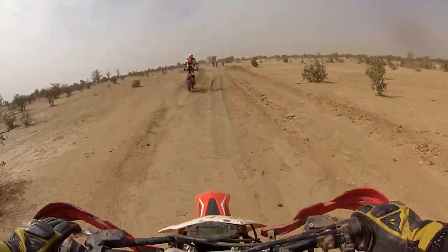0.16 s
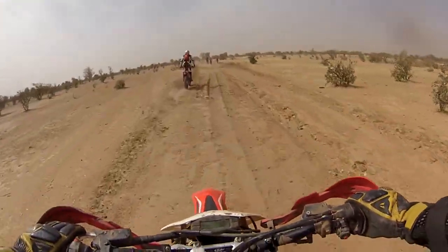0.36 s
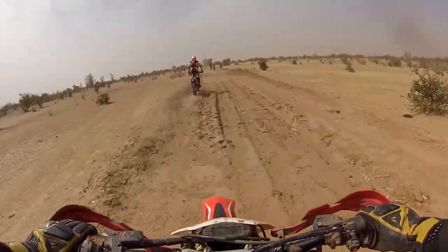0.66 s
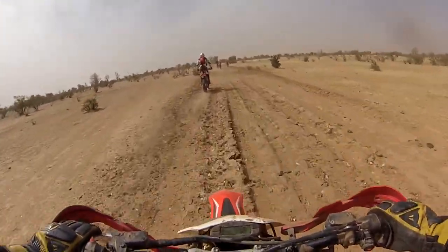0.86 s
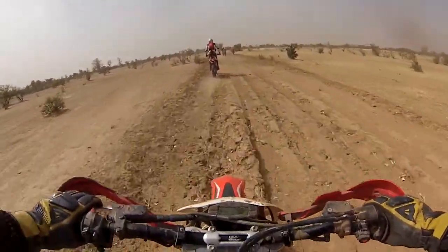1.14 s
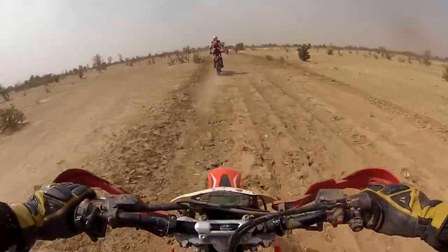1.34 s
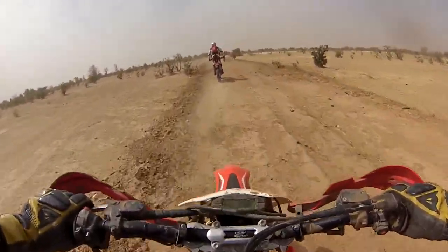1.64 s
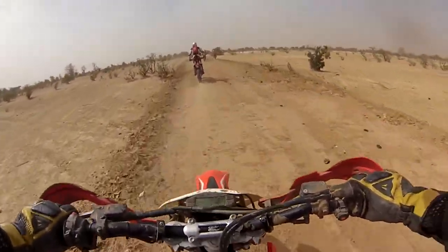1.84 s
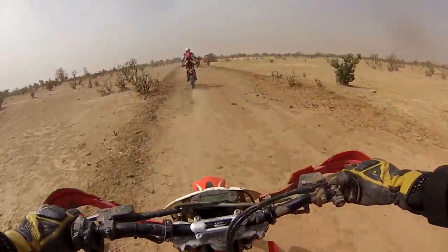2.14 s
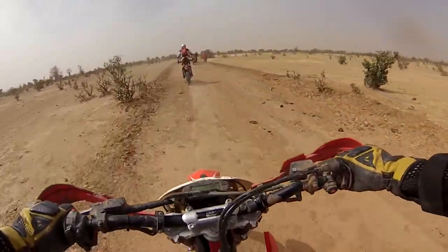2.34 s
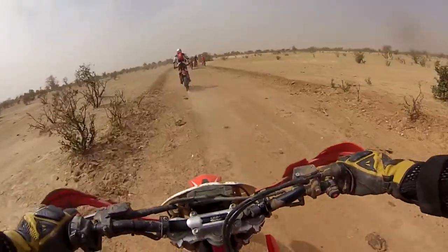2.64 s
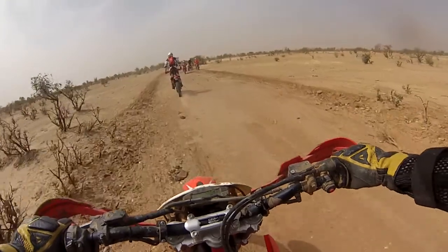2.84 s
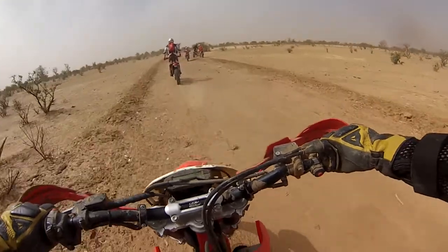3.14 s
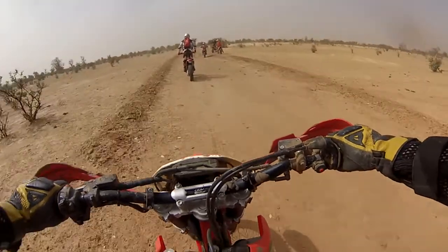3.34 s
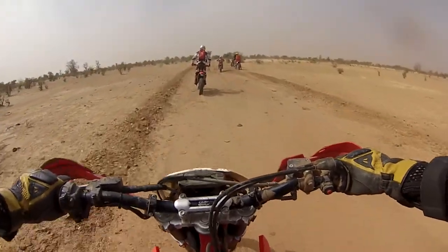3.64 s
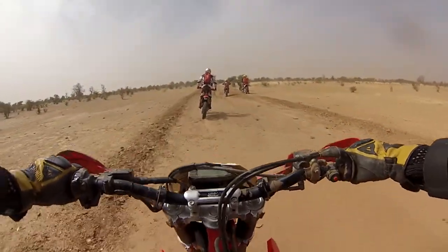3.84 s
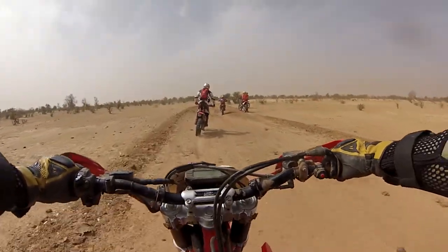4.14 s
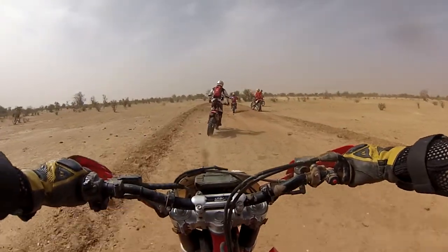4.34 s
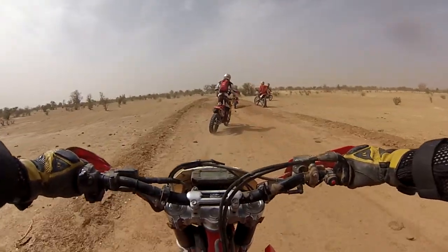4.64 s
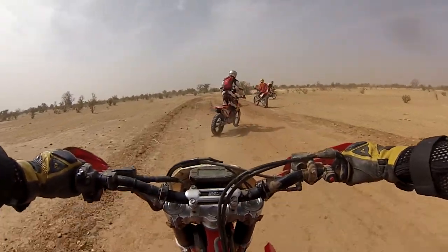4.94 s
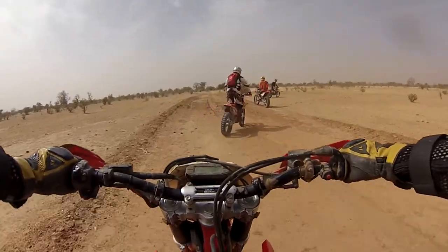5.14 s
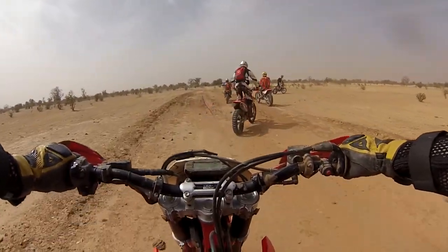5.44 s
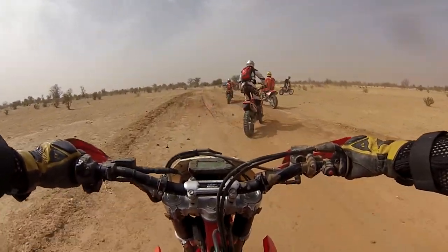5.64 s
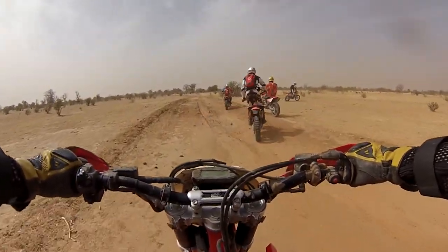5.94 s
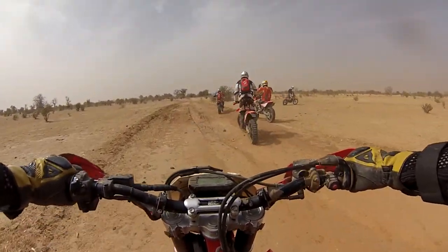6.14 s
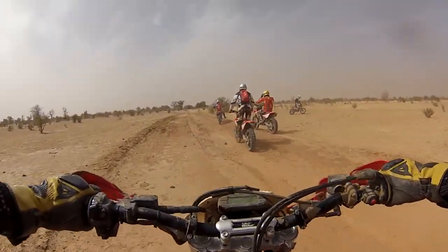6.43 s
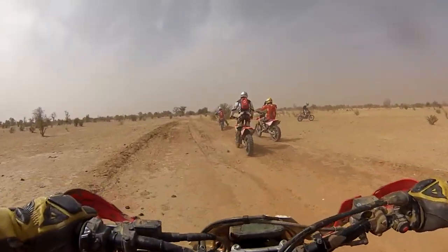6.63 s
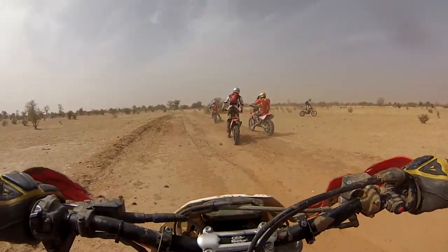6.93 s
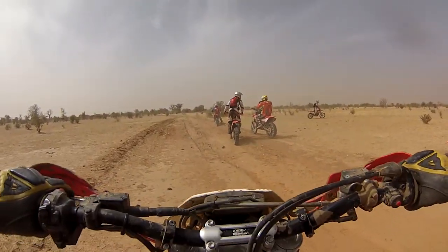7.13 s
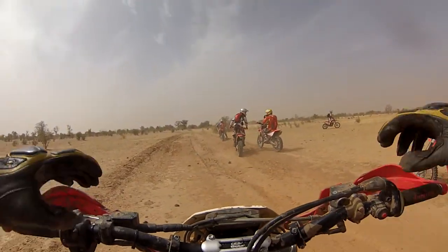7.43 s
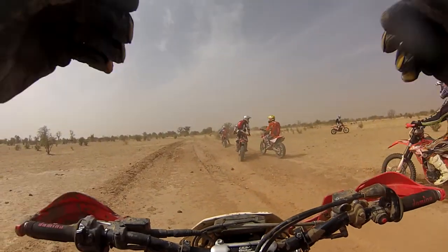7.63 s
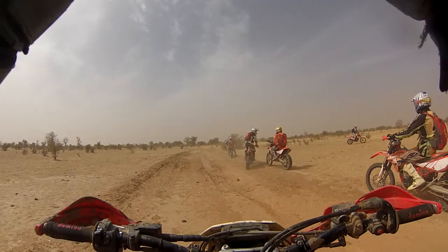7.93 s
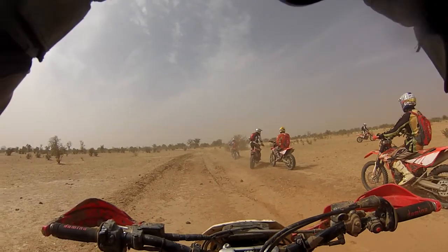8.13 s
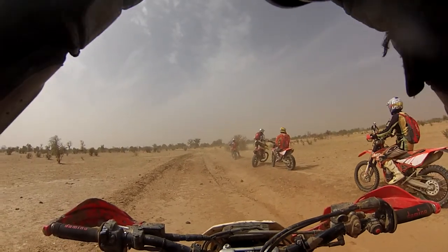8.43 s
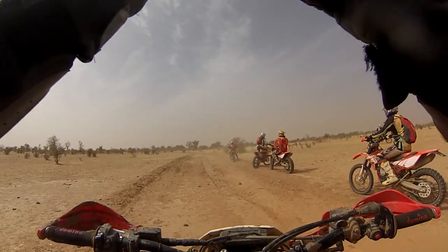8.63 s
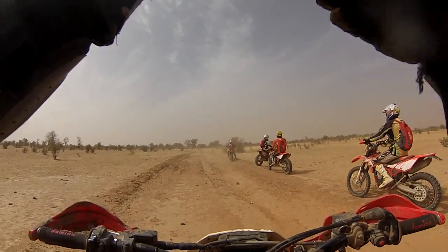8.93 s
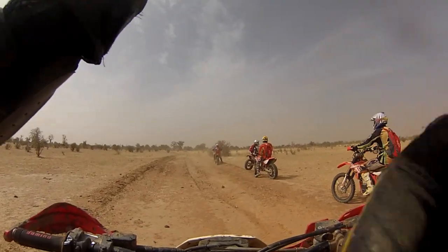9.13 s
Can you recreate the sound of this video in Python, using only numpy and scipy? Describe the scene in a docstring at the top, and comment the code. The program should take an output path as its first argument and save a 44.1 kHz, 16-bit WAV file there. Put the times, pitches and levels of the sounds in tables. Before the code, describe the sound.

A single-cylinder dirt bike coasts over rough sand, heard muffled from a helmet camera in a sealed case. Low engine pulses putter about sixteen times a second under rattly case buzz, sharp plastic knocks and deep wind buffets. Strap scrapes, thin brake squeals and a falling gear whine come midway. After seven seconds only the throbbing idle and light hiss continue, until a glove thumps the case.

```python
"""On rough sand a single-cylinder dirt bike coasts to a stop, heard inside a sealed helmet camera case.
The engine ticks over: firing pulses and gas noise ring pipe resonances, and sines hum at its orders.
Its shaking and road buzz drive the case walls as noise through resonators; knocks and ticks ring decaying
modes. Filtered noise makes wind and hiss; sines make thin brake squeals, one shell scrape, a falling gear
whine and a faint electronic tone. Straps scrape the case, and a glove thumps it at the end."""
import sys
import numpy as np
from scipy import signal
from scipy.fft import rfft, irfft
from scipy.io import wavfile
from scipy.ndimage import uniform_filter1d, map_coordinates

SR = 44100
rng = np.random.default_rng(int(sys.argv[2]) if len(sys.argv) > 2 else 0)


def dump(signal):
    """Clip the signal to [-1, 1] and save it as 16-bit WAV at the path in sys.argv[1]."""
    limited = np.clip(np.atleast_2d(signal).T, -1, 1)
    pcm = np.round(limited * 32767).astype(np.int16)
    wavfile.write(sys.argv[1], SR, pcm)


N = 409248  # samples

START_CYCLES, IDLE_HZ = 1.2, 16.45  # cycle count of the even beat at time zero, its firings per second
# The idle hunts a little. Each row: time in seconds, lead over an even beat in cycles.
IDLE_HUNT = [(0, -.6), (2.4, .05), (4.4, .6), (4.7, .9), (6, .85), (7, .5), (8.2, .4), (9.28, .05)]
# Resonances of exhaust pipe and airbox. Each row: frequency in Hz, width in Hz, gain in dB.
PIPE_MODES = [(33.7, 4.8, 5), (64, 29.8, -4), (134, 26.2, -3), (201.5, 43.3, -9), (262.5, 29.7, -8),
              (319, 20.8, -12.5), (583, 46, -26)]
# Hum of crank, balancer and gears. Each row: multiple of the firing rate, relative level in dB.
ENGINE_ORDERS = [(2, -7), (4, -5), (8, 0), (12, -10), (13, -10), (16, -8), (17, -11), (19, -14), (20, -12),
                 (33, -19), (34, -19)]
ENGINE_DB, PUFF_DB, HUM_DB = -40, -38.5, -44.5  # rms before the speed fade and the low-pass
ROLLING_S = 7.0  # the bike stands after this

# Resonances of the case walls and the air inside. Each row: frequency in Hz, width in Hz, gain in dB.
CASE_MODES = [(546, 155, -2), (1123, 426, -3.5), (1267.4, 36.5, 6.5), (1381.5, 56, 3), (1406, 338, -3),
              (2170, 260, -9), (2428, 230, -3), (2444, 60, -0.5), (2888, 140, -12.5), (3526, 435, -19.5),
              (4560, 540, -23.5), (5440, 2100, -31.5), (7040, 660, -34.5)]
# Shaking of the case. Each row: time in seconds, level in dB, its treble against that in dB,
# lift of the 2.4 kHz modes in dB (their upper neighbour drops twice as much).
CASE_SHAKE = [(0, -35, 1, -2.5), (0.46, -37.5, -0.5, -3), (0.7, -39, 2.5, -4), (1.05, -37, 1.5, -3.5),
              (1.5, -36.5, 3, -2), (1.8, -39.5, 3.5, -3.5), (2.55, -41, 0, -2.5), (2.75, -42, 4.5, 6),
              (3.1, -43, 1.5, -1), (3.47, -41, 4.5, -3), (3.88, -42.5, 1.5, 0), (4.12, -42, 3, -2),
              (4.3, -41, 0, -1.5), (5.0, -43, -1.5, -0.5), (5.9, -43.5, 0.5, 1), (6.4, -41, 2.5, 0),
              (7.26, -43.5, 5, 3.5), (9.28, -42.5, 5.5, 1.5)]
# Straps and grit scrape over the shell. Each row: start in seconds, length in seconds,
# lift of the shaking in dB, further lift of its treble in dB.
SCRAPES = [(0.404, 0.094, 1.5, 1.5), (2.09, 0.02, 5.5, 2), (2.512, 0.021, 4, 9), (2.714, 0.032, 2.5, 2),
           (2.86, 0.043, 5.5, 0), (3.026, 0.076, 2, 5), (3.159, 0.021, 1.5, 5), (3.438, 0.031, 3, 5),
           (4.009, 0.14, 2.5, 0.5), (4.152, 0.03, 2, 1.5), (6.286, 0.22, 1, 2), (6.6, .05, -0.5, 2)]
WALL_FLEX = .004  # share by which a wall mode wavers in pitch

# The case knocks on its mount. Each row: time in seconds, peak in dB before the low-pass, low wall mode
# against the rest in dB, one bounce against the blow in dB (-30 = none heard).
KNOCKS = [(0.05, -25, -10, -30), (0.076, -22, 1, -30), (0.3231, -18, -5, 1.5), (0.34, -20.5, 4, -5),
          (0.6732, -24, -8, -25), (0.993, -21.5, -9, -3), (1.0098, -11, 4, -9), (1.243, -11.5, -4, -14),
          (1.3286, -19, 3, -30), (1.41, -21.5, -17, -44), (1.486, -16, -8, 2), (1.5085, -9, 4, -30),
          (1.518, -14, 0, -30), (1.603, -24, -16, 0), (1.6568, -14, -11, -18), (1.755, -15.5, -14, -8),
          (1.8193, -11.5, -25, -1), (1.939, -29.5, 6, -30), (1.954, -27, -10, -30), (1.999, -24.5, 19, -6),
          (2.099, -31, 22, -30), (2.107, -11, -21, -34), (2.194, -24.5, -8, -30), (2.218, -25.5, 19, -30),
          (2.516, -26, 0, -23), (2.629, -29, 14, -30), (2.643, -24, -7, -35), (2.7047, -25, 7, -30),
          (2.744, -21, 8, -30), (2.755, -20, 17, -28), (2.8102, -17.5, -2, -30), (2.867, -23, 6, -10),
          (2.8764, -30, 13, -7), (3.4598, -23, 7, 1), (3.495, -18.5, -11, -25), (3.724, -26.5, -3, 1.5),
          (3.819, -29, -8, -30), (4.0022, -23.5, -1, -4), (4.173, -31, 17, -3), (4.182, -34, -10, -30),
          (4.393, -25.5, -15.5, -36), (4.4815, -20, 8, -32), (4.512, -24.5, -18, -30), (4.856, -28, 4, -28),
          (5.2727, -19.5, 6, -34), (5.4548, -30, 5, 0), (5.8562, -22, -9, -32), (5.939, -26.5, 0, -30),
          (6.242, -14.5, 3, -19), (6.3055, -25, -3, -30), (6.432, -22.5, -14, -1), (6.545, -25, -21, 0),
          (6.7115, -22.5, -14, -30), (6.723, -24.5, -8, -30), (6.876, -21.5, -1, -41),
          (6.936, -30, -7, -30), (7.0325, -31, -7, -30), (7.0963, -33, 0, -30), (7.1866, -35, -5, -30),
          (7.229, -34, -6, -30), (7.244, -32, -10, -30), (8.678, -25.5, 3, -28), (8.91, -19, 5, -32),
          (9.25, -21, -11, -37), (9.26, -15.5, 3, -7)]
# Modes rung by a knock. Each row: frequency in Hz, relative level in dB, 60 dB decay time in seconds.
KNOCK_MODES = [(1447, 17, 0.0079), (2120, 14, 0.0055), (2318, -8.5, 0.027), (3180, -0.5, 0.0096),
               (3560, -16, 0.028), (1070, -17, 0.013), (1710, -3, 0.011)]
# Grit and buckles tick on the shell. Each row: time in seconds, peak in dB,
# top mode against the rest in dB.
TICKS = [(0.676, -40, 5), (0.706, -42, 5), (0.958, -40, -1), (1.0179, -32, 4), (1.2453, -30.5, -26),
         (1.3295, -35, -1), (1.411, -37, -10), (1.5081, -29, 1), (1.5428, -34, -16), (1.6673, -36, -12),
         (1.7059, -38, -19), (2.0936, -39, -29), (2.1916, -33, -24), (2.5177, -41, -18), (2.719, -44, -20),
         (2.866, -42, -12), (3.097, -41, -20), (3.1712, -37, -18), (3.45, -46, -5), (4.0274, -48, -19),
         (4.045, -40, -22), (4.115, -47, -19), (4.1549, -43, -19), (4.1732, -46, -16), (4.194, -44, -16),
         (4.5129, -35.5, -4), (5.318, -45, -15), (5.94, -41, -15), (6.02, -41, -15), (6.0596, -36, -15),
         (6.2433, -25, -18), (6.3059, -38, -18), (6.6481, -40, -13), (6.7111, -37, -20), (7.245, -45, -15),
         (8.9118, -31.5, 2), (9.2512, -27, -36), (9.2601, -29, 6), (9.2732, -36, 6)]
# Modes rung by a tick. Each row: frequency in Hz, relative level in dB, 60 dB decay time in seconds.
TICK_MODES = [(11150, 5.5, 0.0041), (5260, -2, 0.012), (5830, -1, 0.0049), (6630, 7.5, 0.002),
              (7430, -13.5, 0.0068), (9450, -5, 0.0052), (4130, 7.5, 0.0033)]
BOUNCE_S = .0077  # delay of a bounce
FAINT_KNOCK_DB, FAINT_TICK_DB = -33, -48  # mid peak levels of the many small ones while it rolls
# Glove blows. Each row: time in seconds, starting amplitude in dB, frequency in Hz.
THUMPS = [(9.245, -30, 77.4), (9.255, -10, 74.5), (9.2707, -14, 77.5)]

# Squeals of pad on disc, and one scrape of the shell near 2.5 kHz. Each row: start in seconds,
# length in seconds, starting frequency in Hz, rate of the random wavering in Hz,
# rms level in dB before swell and shaking.
SQUEALS_AND_SCRAPE = [(3.21, 0.093, 4780, 60, -66), (3.21, .2, 5220, 50, -67), (3.5, 0.14, 4500, 70, -64),
                      (3.637, .39, 4810, 50, -65), (4.03, .11, 5950, 250, -64), (4.05, .07, 5330, 150, -64),
                      (4.01, .11, 2500, 150, -50), (4.45, 0.4, 6000, 90, -73), (4.2, 1.4, 7750, 150, -77)]
SAG_HZ_PER_S = 700  # those under 0.4 s sink as the wheel slows
# Gear whine. Each row: time in seconds, mean frequency in Hz, rms level in dB before it wavers.
GEAR_WHINE = [(3.9, 1560, -64), (4.17, 1400, -54), (4.3, 1330, -61), (4.55, 1200, -57), (4.9, 1110, -62),
              (5.2, 1050, -66)]

# Steady wind. Each row: time in seconds, relative deep flutter in dB, relative rumble in dB.
STEADY_WIND = [(0, -25, -30.5), (1.8, -15.5, -37), (2.3, -26, -57), (3.8, -28.5, -37.5), (5.0, -25, -47.5),
               (6.0, -31, -42.5), (7.3, -30.5, -35.5), (8.6, -33, -35), (9.28, -29.5, -26.5)]
# Gusts on top of it. Each row: peak time in seconds, length in seconds,
# relative deep flutter in dB, relative rumble in dB.
GUSTS = [(0.01, 0.15, -11, -28), (0.45, 0.22, -17.5, -42), (0.695, 0.24, -6.5, -28.5),
         (1.054, 0.48, -13, -27.5), (1.423, 0.39, -16, -20.5), (1.572, 0.29, -8.5, -29),
         (2.76, 0.21, -17, -46), (2.893, 0.18, -11, -45), (3.104, 0.092, -16, -49),
         (3.394, 0.23, -17.5, -30), (3.608, 0.15, -13.5, -49), (4, 0.12, -26, -37),
         (4.223, 0.068, -18, -38), (4.48, 0.067, -18, -29.5), (4.677, 0.37, -20.5, -53),
         (5.2, 0.17, -24.5, -35.5), (5.512, 0.11, -22, -50), (5.814, 0.21, -24, -53),
         (6.251, 0.16, -27, -24), (6.4, 0.21, -28.5, -26.5)]
GUST_RISE = 0.35  # a gust rises in this share of its length

# Spectrum of the air and microphone hiss. Each row: frequency in Hz, relative density in dB per Hz.
HISS_SPECTRUM = [(2000, -20), (3500, -3.5), (5000, -1), (7500, -6.5), (8200, -10.5), (10000, -13),
                 (12500, -15), (15500, -20.5)]
HISS_DB = -63  # rms before the scrapes lift it
# Electronic tone. Each row: frequency in Hz, rms level in dB.
BUZZ = [(12586, -94)]
TOP_HZ = 15400  # upper limit of the camera


def undb(db):
    """Logarithmic level: turn dB into an amplitude gain."""
    return 10 ** (np.asarray(db) / 20)


def level(x, db):
    """Mean power: scale a signal to an rms level in dB."""
    return x * undb(db) / np.sqrt(np.mean(x ** 2))


def curves(table):
    """Linear interpolation: join the columns of a table by straight lines in time."""
    s, *columns = np.transpose(table)
    return [np.interp(np.arange(N) / SR, s, c) for c in columns]


def band(x, hz, width):
    """Resonance: a single peak with gain 1 at its centre."""
    return signal.lfilter(*signal.iirpeak(hz, hz / width, fs=SR), x)


def ring(x, modes):
    """Modal superposition: a sum of resonances with alternating signs."""
    return sum((-1) ** k * undb(db) * band(x, hz, width) for k, (hz, width, db) in enumerate(modes))


def dull(x, hz):
    """Transmission loss: a steep low-pass for what the sealed case lets through."""
    return signal.sosfilt(signal.butter(3, hz, fs=SR, output="sos"), x)


def walk(rate):
    """Slow random fluctuation: levels held 1 / rate s and smoothed twice, with spread near 1."""
    k = int(SR / rate)
    held = np.repeat(rng.standard_normal(N // k + 1), k)
    return 1.206 * uniform_filter1d(uniform_filter1d(held, k), k)[:N]


def swell(start, length):
    """Amplitude envelope: rises quickly, holds, and falls quickly."""
    corners = start + length * np.array([0, .15, .85, 1])
    return np.interp(np.arange(N) / SR, corners, [0, 1, 1, 0])


def add(out, s, sound):
    """Superposition: mix a short sound in at a time in seconds."""
    i = int(s * SR)
    out[i:i + len(sound)] += sound[:len(out) - i]


def frame_shake(phase):
    """Periodic forcing: each firing shakes the frame, then a second jolt, then a faint valve knock."""
    firing = 1.7 * np.exp(-(((phase + .53) % 1 - .5) / .1) ** 2)
    second_jolt = .9 * np.exp(-((phase - .37) / .06) ** 2)
    valve_knock = .35 * np.exp(-((phase - .67) / .05) ** 2)
    shake = 1 + firing + second_jolt + valve_knock
    return shake / np.sqrt(np.mean(shake ** 2))


def engine():
    """Pulse-excited resonance: uneven firings ring the pipe; returns sound and frame shaking."""
    beat = START_CYCLES + IDLE_HZ * np.arange(N) / SR + uniform_filter1d(curves(IDLE_HUNT)[0], SR // 4)
    cycle = beat + .015 * walk(16)
    phase = cycle % 1
    size = undb(1.2 * rng.standard_normal(200))[cycle.astype(int)]
    firing = np.diff(np.floor(cycle), prepend=0).clip(0, 1) * size
    # a weaker gulp half a cycle on
    intake = 0.57 * np.diff(np.floor(cycle + .5), prepend=0).clip(0, 1)

    puff_size = .12 + size * np.exp(-phase / .26) + .5 * np.exp(-((phase - .36) % 1) / .1)
    puff = puff_size * rng.standard_normal(N)
    # turbulent gas after each firing damps the pipe, so its resonances are wider
    gas = ring(puff, [(hz, 2 * width, db) for hz, width, db in PIPE_MODES[1:]])

    # at speed the low exhaust note trails away from the rider
    behind_db = np.interp(np.arange(N) / SR, [3, ROLLING_S], [-5, 0])
    wobble = beat + .008 * walk(5)
    hum = np.zeros(N)
    for order, db in ENGINE_ORDERS:
        gain = undb(db + 2 * walk(5) + behind_db * (order < 10))
        hum += gain * np.sin(2 * np.pi * (order * wobble + rng.random()))

    exhaust = undb(behind_db) * level(ring(firing + intake, PIPE_MODES), ENGINE_DB)
    sound = exhaust + level(gas, PUFF_DB) + level(hum, HUM_DB)
    return dull(-sound, 1270.0), frame_shake(phase)


def case(shake, rattle, shake_db, treble_db, mode_db, rasp_db):
    """Forced modal vibration: engine shake and road buzz drive wavering walls; scrapes rasp near 1 kHz."""
    out = np.zeros(N)
    # road buzz hides the throb at speed
    shake = shake ** np.interp(np.arange(N) / SR, [0, ROLLING_S], [.4, .9])
    for hz, width, db in CASE_MODES:
        if hz < 800:
            throb = np.roll(shake, SR // 160) ** 1.3  # the lowest mode answers late
        else:
            # of these, modes near 2.4 kHz throb most and those near 1.3 kHz least
            depth = .35 if hz < 1800 else 1.1 if hz < 3000 else .7
            throb = rattle * shake ** depth
        tilt_db = treble_db * (hz > 3000) + rasp_db * (800 < hz < 1200)
        tilt_db = tilt_db + mode_db * ((2250 < hz < 2600) - 2 * (2600 < hz < 3000))
        drive = throb * undb(1.5 * walk(18) + tilt_db) * rng.standard_normal(N)
        if hz > 3000:
            width = max(width, hz / 14)  # the high modes are well damped
        wall = band(band(drive, hz, 2 * width), hz, width)
        # the wall flexes, so its pitch wanders: read it at a wavering time
        flex = np.arange(N) + WALL_FLEX * SR * walk(5) / 5
        out += undb(db) * map_coordinates(wall, [flex], mode="mirror")
    return dull(level(out, 0.34), 13000.0) * undb(shake_db)


def clatter(shake_db):
    """Random impulses: loose parts jolt more often in stronger shaking; returns a gritty envelope."""
    rate = 14 * undb(1.4 * (shake_db - shake_db.mean())) * (np.arange(N) < ROLLING_S * SR)  # per second
    jolts = (rng.random(N) < rate / SR) * np.minimum(rng.exponential(size=N), 1.8)
    bursts = signal.lfilter([1], [1, -np.exp(-1 / (0.0093 * SR))], jolts)
    return 1 + 0.5 * uniform_filter1d(bursts, size=SR // 300)


def scrapes():
    """Rough sliding friction: gritty lifts in dB for the whole shaking and for its treble."""
    grit = 1 + .4 * walk(150)
    return [grit * sum(row[k] * swell(row[0], row[1]) for row in SCRAPES) for k in (2, 3)]


def blows(table, modes, contact_s, chatter):
    """Impact response: a click in a short rough contact, then loose chatter, rings decaying modes."""
    out, t = np.zeros(N), np.arange(SR // 20) / SR
    rings = np.array([undb(db) * np.sin(2 * np.pi * hz * t) * 1000. ** (-t / t60)
                      for hz, db, t60 in modes])
    contact = (t / contact_s) ** 2 * np.exp(-t / contact_s)
    loose = chatter * (1 - np.exp(-t / contact_s)) * 1000. ** (-t / 0.069)
    click = 3.6 * (np.arange(len(t)) == int(contact_s * SR))
    centre = modes[2][0]
    noises = rng.standard_normal((len(table), len(t)))
    for (s, db, first_db), noise in zip(table, noises):
        force = (contact + loose) * noise + click
        rough = band(band(force, centre, 1.1 * centre), centre, 1.1 * centre)
        response = undb(first_db) * rings[0] + rings[1:].sum(axis=0)
        sound = signal.fftconvolve(rough, response)[:len(t)]
        add(out, s, undb(db) * sound / abs(sound).max())
    return out


def faint(db, count):
    """Random arrivals: rows of small blows at chance times while the bike rolls."""
    s, size, colour = rng.random((count, 3)).T
    return np.transpose([ROLLING_S * s, db + 2.4 * (size - .5), -10 + 18 * (colour - .5)])


def knocks_and_ticks():
    """Repeated impact: the mount knocks and bounces once, and hard grit and buckles tick."""
    table = np.array(KNOCKS)
    first, bounce_db = table[:, :3], table[:, 3]
    bounces = first.copy()
    bounces[:, 0] += BOUNCE_S
    bounces[:, 1] += bounce_db
    knocks = np.vstack([first, bounces, faint(FAINT_KNOCK_DB, count=12)])
    ticks = np.vstack([TICKS, faint(FAINT_TICK_DB, count=20)])
    knocking = dull(blows(knocks, KNOCK_MODES, 0.00054, 0.21), 3970.0)
    return knocking + blows(ticks, TICK_MODES, 0.000465, 0.21)


def thumps():
    """Damped oscillation: a glove pushes the case in soft low blows."""
    out, t = np.zeros(N), np.arange(SR // 10) / SR
    for s, db, hz in THUMPS:
        add(out, s, undb(db) * np.sin(2 * np.pi * hz * t) * 1000. ** (-t / 0.15))
    return out


def squeals_and_scrape(shake):
    """Friction-driven oscillation: pads on discs, and one scrape of the shell, as thin wavering tones."""
    out, t = np.zeros(N), np.arange(N) / SR
    for s, length, hz, width, db in SQUEALS_AND_SCRAPE:
        pitch = hz - SAG_HZ_PER_S * (length < .4) * np.clip(t - s, 0, length)
        tone = walk(width) * np.sin(2 * np.pi * np.cumsum(pitch) / SR)
        out += swell(s, length) * shake * level(tone, db)
    return out


def gear_whine():
    """Gear-mesh tone: a wavering sine whose pitch sinks with the speed."""
    hz, db = curves(GEAR_WHINE)
    heard = np.interp(np.arange(N) / SR, [3.8, 4.0, 5.0, 5.3], [0, 1, 1, 0])
    pitch = hz * (1 + 0.007 * walk(40))
    tone = np.sin(2 * np.pi * np.cumsum(pitch) / SR)
    return np.sqrt(2) * heard * undb(db + 4 * walk(18)) * tone


def gusts():
    """Power addition: steady wind plus every gust, as levels of flutter and rumble in dB."""
    s, length, *gust_db = np.transpose(GUSTS)[:, :, None]
    late = (np.arange(0, N + 64, 64) / SR - s) / length  # a coarse grid of 64 samples
    shape = np.exp(-4 * np.where(late < 0, late / GUST_RISE, late) ** 2)
    totals = []
    for steady_db, peak_db in zip(curves(STEADY_WIND), gust_db):
        power = np.repeat((shape * undb(2 * peak_db)).sum(axis=0), 64)[:N]
        totals.append(10 * np.log10(undb(2 * steady_db) + uniform_filter1d(power, 64)))
    return totals


def wind(buffet_db, rumble_db):
    """Turbulent pressure: eddies press on the case as deep flutter, lumpy rumble and a fainter rough edge."""
    deep = dull(band(band(rng.standard_normal(N), 22., 40.), 21., 36.), 50.) * undb(1.5 * walk(20))
    rumble = dull(band(rng.standard_normal(N), 75., 70.), 150.)
    edge = dull(band(rng.standard_normal(N), 280.0, 380.0), 434.0)
    gust = level(rumble * undb(2.2 * walk(14)), -4.5) + level(edge, -17)
    return undb(buffet_db) * level(deep, -6.0) + undb(rumble_db) * gust


def hiss(shake, shake_db):
    """Spectral shaping: a smooth noise that only mildly follows the engine and the ride."""
    hz = np.arange(N // 2 + 1) * SR / N + 1
    table_hz, table_db = np.transpose(HISS_SPECTRUM)
    colour = undb(np.interp(np.log(hz), np.log(table_hz), table_db, left=-80))
    air = rng.standard_normal(N) * shake ** .25
    ride = undb(0.72 * uniform_filter1d(shake_db, SR // 2))
    return level(irfft(rfft(air) * colour, N) * ride, HISS_DB)


def buzz():
    """Steady sinusoid: the camera's circuits sing faintly."""
    t = np.arange(N) / SR
    return np.sqrt(2) * sum(undb(db) * np.sin(2 * np.pi * hz * t) for hz, db in BUZZ)


def scene():
    """Linear superposition: all sources at the single microphone."""
    shake_db, treble_db, mode_db = curves(CASE_SHAKE)
    motor, shake = engine()
    loose = clatter(shake_db)
    scrape_db, bright_db = scrapes()
    walls = case(shake, loose, shake_db + scrape_db, treble_db + bright_db, mode_db, scrape_db)
    impacts = knocks_and_ticks() + thumps()
    air = hiss(shake * loose, shake_db) * undb(0.47 * bright_db)
    tones = squeals_and_scrape(shake) + gear_whine() + buzz()
    return (motor + walls + impacts + tones + wind(*gusts()) + air)[None]


def record(dry):
    """Band limitation: the camera drops the deepest bass and cuts the top."""
    dry = signal.sosfilt(signal.butter(1, 8., "highpass", fs=SR, output="sos"), dry)
    return signal.sosfilt(signal.ellip(10, .2, 70, TOP_HZ, fs=SR, output="sos"), dry)


dry = scene()
out = record(dry)
dump(out)
```